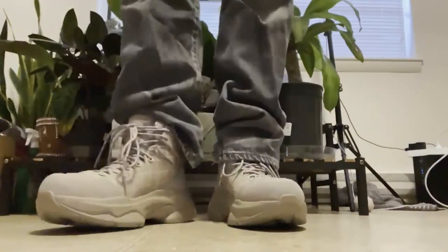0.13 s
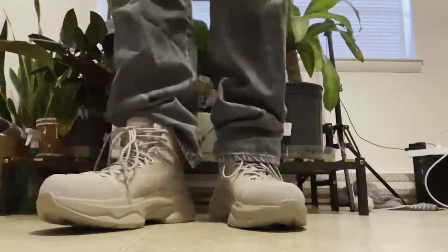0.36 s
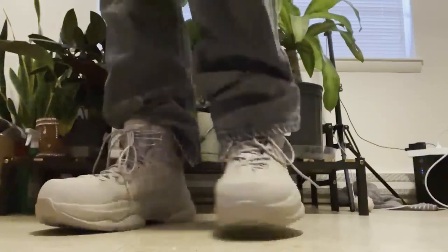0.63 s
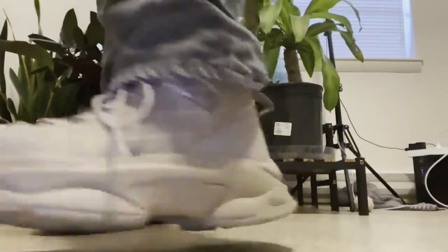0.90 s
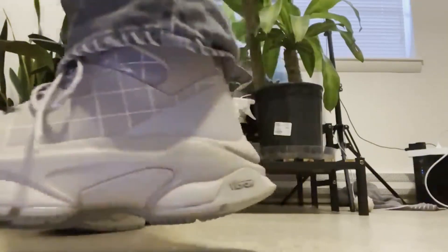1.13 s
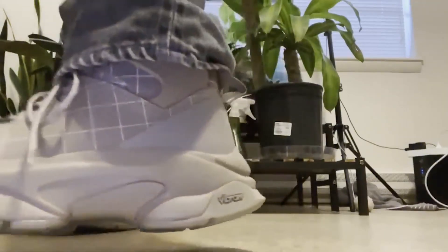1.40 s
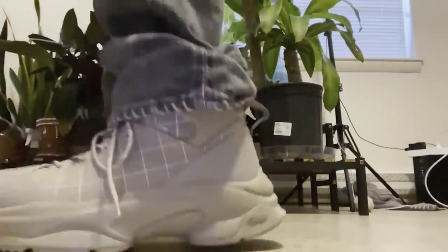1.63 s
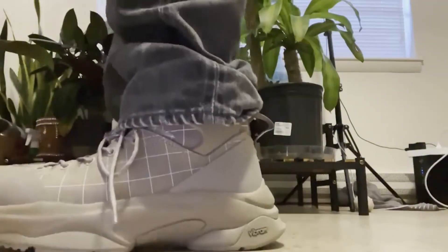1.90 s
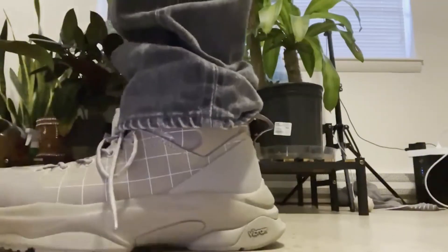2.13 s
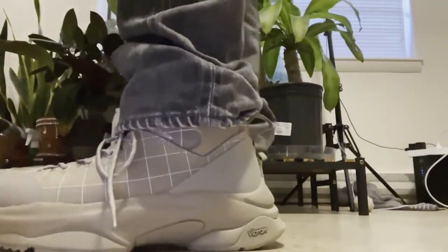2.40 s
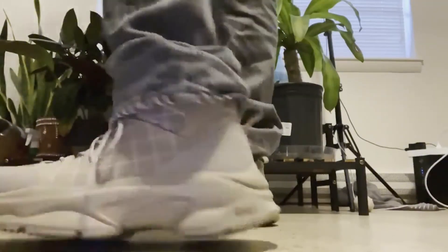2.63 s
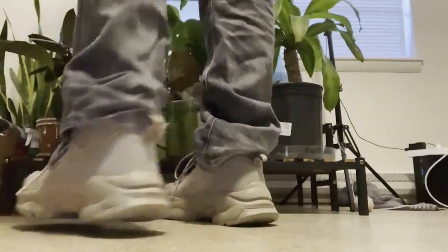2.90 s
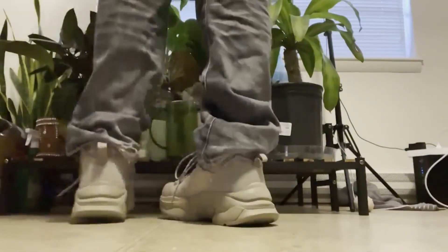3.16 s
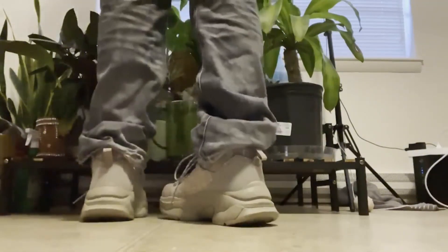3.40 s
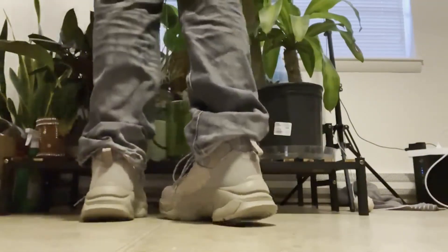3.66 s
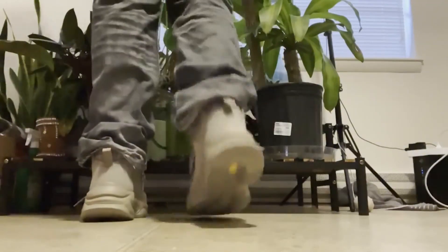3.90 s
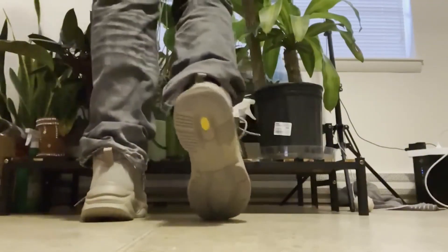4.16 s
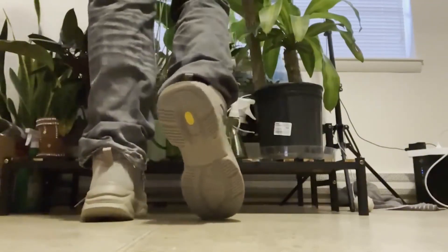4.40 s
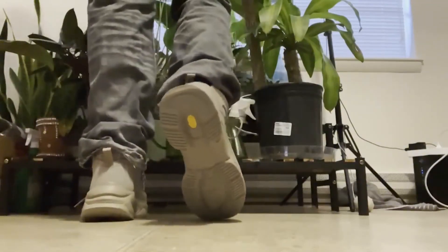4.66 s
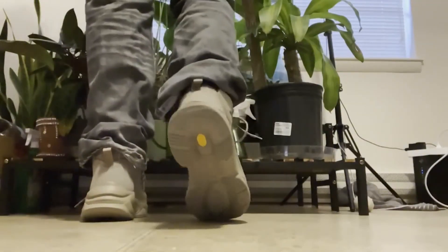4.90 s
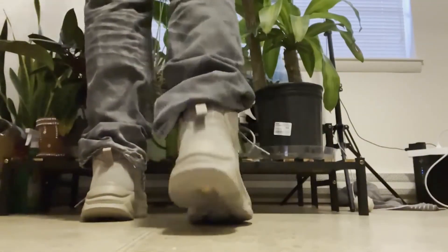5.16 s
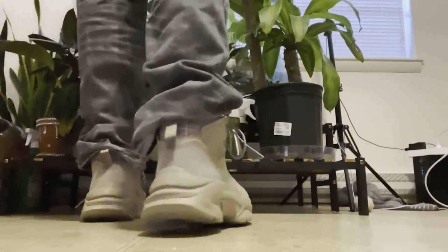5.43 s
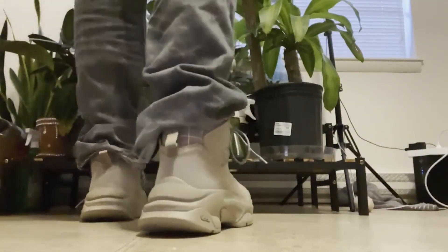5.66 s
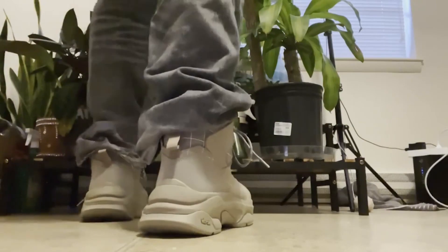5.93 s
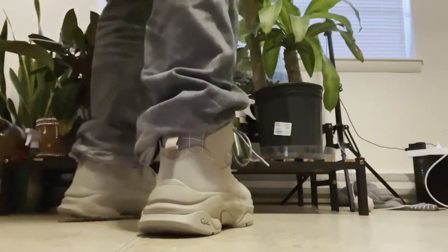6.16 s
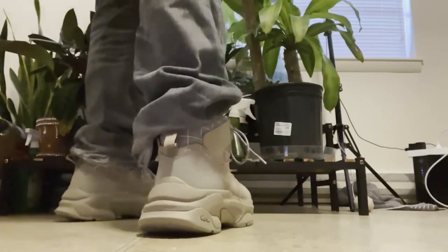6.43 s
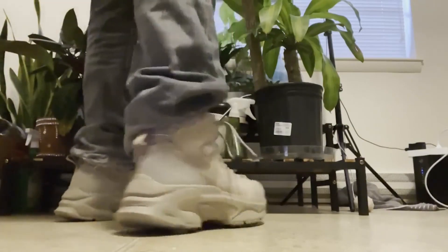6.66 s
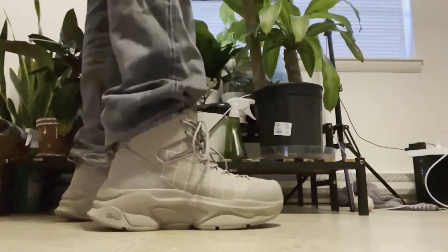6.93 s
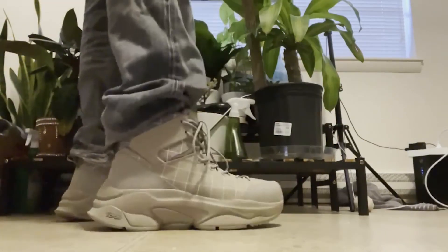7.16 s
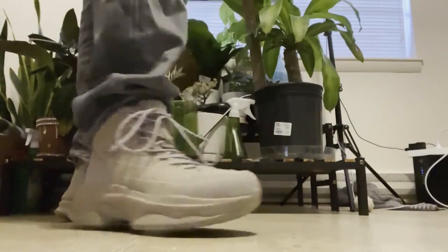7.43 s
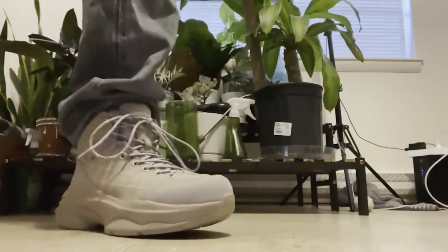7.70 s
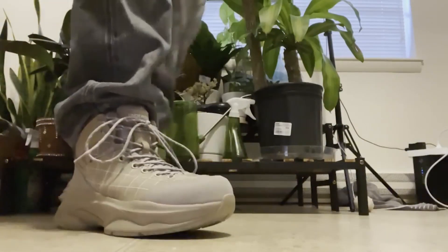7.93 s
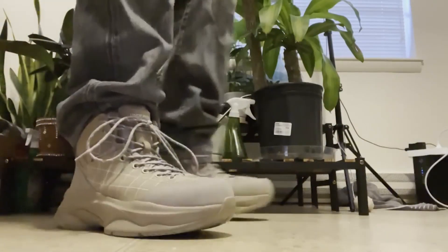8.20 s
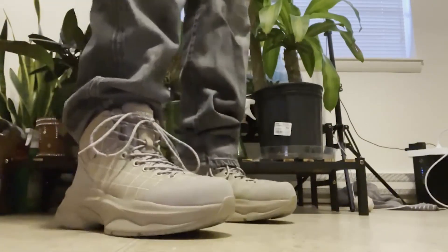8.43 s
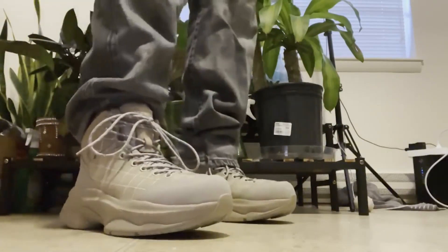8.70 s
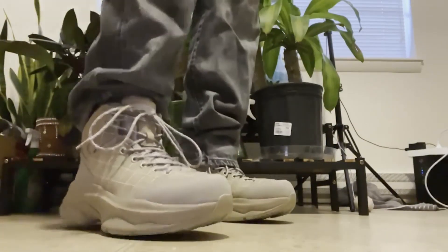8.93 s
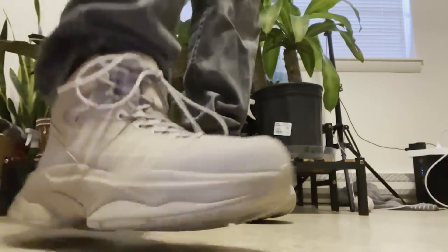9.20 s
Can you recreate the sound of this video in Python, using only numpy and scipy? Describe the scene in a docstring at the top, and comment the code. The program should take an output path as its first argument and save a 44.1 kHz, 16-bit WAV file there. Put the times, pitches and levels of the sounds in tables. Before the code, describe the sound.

Very close, floor-level sound of someone shifting and turning in chunky boots. Footfalls are dull, low thumps that ring briefly in the floor; the tread slips in short dry scuffs, with crisp ticks and very brief rubbery chirps. Pacing is uneven, with pauses of soft cloth rustle. The small room adds short echoes, and a faint hum and whine emerge in the second half.

```python
"""Rubber boots on a hard floor

Chunky rubber-soled boots step, turn and scuff on a hard indoor floor, next to a microphone lying on it.
Footfalls send falling thumps through the floor, which rings on after them. The tread slips as bursts of
jumpy noise, squeaks as short gliding tones and ticks as sharp clicks. Trouser cloth rustles as lumpy noise.
Underneath lie a quiet room tone, a low rumble, faint machine hums and a whine; a room adds short echoes."""
import sys
import numpy as np
from scipy import signal
from scipy.fft import rfft, irfft, next_fast_len
from scipy.io import wavfile
from scipy.ndimage import uniform_filter1d

SR = 44100
rng = np.random.default_rng(int(sys.argv[2]) if len(sys.argv) > 2 else 0)


def voltage_ratio(decibels):
    """Convert decibels (scalar or array-like) to amplitude ratios, 20 dB per decade."""
    exponent = np.asarray(decibels, float) / 20
    return 10 ** exponent


def generate_wav(signal):
    """Clip the signal to [-1, 1] and save it as 16-bit WAV at the path in sys.argv[1]."""
    frames = np.transpose(np.atleast_2d(signal))
    scaled = np.clip(frames, -1, 1) * 32767
    pcm = np.round(scaled).astype(np.int16)
    wavfile.write(sys.argv[1], SR, pcm)


N = 411012  # length in samples

# footfalls: [t/s, peak level of the blow/dB, bass ring trim/dB, low-mid ring trim/dB,
# extra treble of the blow/dB, growing from 550 Hz and full above 1100 Hz]
FOOTFALLS = [(1.596, -34, -3.5, -8.5, -7), (1.625, -24.5, -2, -11.5, -6), (1.877, -38, -8, 0, -7),
             (2.283, -29, -11, -14, -27), (2.334, -28, -12.5, -4, -4), (2.407, -30.5, -11.5, -18, 11),
             (2.511, -44, 1, -6, -25), (2.559, -42.5, 2, -12, -25), (3.19, -36, -5.5, -3.5, -1),
             (3.282, -20.5, -13.5, -6, -18), (3.919, -32, -4, -5.5, -15), (4.304, -41, -4.5, -8.5, 7),
             (5.446, -38, -3.5, -16, -24.5), (6.127, -29, -5, 2.5, -3), (6.728, -38.5, 9, -4.5, -23),
             (6.786, -31.5, -11.5, -13.5, -1), (6.797, -29.5, -6.5, -4, -4), (7.463, -29, -21.5, -6, -2),
             (7.508, -37, -6, -5.5, -9), (7.791, -41, -8.5, -10, -20), (8.177, -37, -11.5, 2, -12),
             (8.199, -34.5, -18, -16, -10), (8.222, -28.5, -6.5, -7, -10.5), (9.282, -25.5, 0, -9.5, -11)]
# tread dragged on the floor: [t/s, length/s, sole level/dB, hiss level/dB, favoured peak f/Hz]
SCUFFS = [(0.287, 0.036, -45.5, -56, 1065), (0.314, 0.021, -45.5, -47.5, 1064),
          (0.347, 0.047, -36.5, -50, 1756), (0.394, 0.029, -33, -36.5, 638),
          (0.434, 0.0078, -35, -32.5, 5970), (0.444, 0.027, -31, -31, 920), (1.34, 0.023, -60, -77, 700),
          (1.846, 0.13, -47.5, -64, 343.4), (2.332, 0.016, -43, -64, 804), (2.468, 0.028, -45, -62, 1530),
          (2.496, 0.015, -39.5, -46.5, 1056), (2.538, 0.011, -39, -44.5, 2452),
          (2.555, 0.0086, -35.5, -43.5, 1198), (2.651, 0.012, -58, -59, 7500),
          (2.677, 0.04, -52.5, -56.5, 1082), (3.183, 0.047, -58, -55, 6730), (3.297, 0.088, -53, -65, 492),
          (3.464, 0.019, -42.5, -49.5, 589), (3.513, 0.03, -50.5, -54.5, 511),
          (3.538, 0.014, -26, -35, 475), (3.563, 0.021, -40.5, -74, 498), (3.65, 0.026, -39.5, -49.5, 3250),
          (3.68, 0.035, -29.5, -31, 1036), (3.706, 0.015, -30, -31, 7670), (3.907, 0.025, -59, -60, 1807),
          (4.294, 0.058, -56, -66.5, 628), (5.026, 0.0091, -38, -42, 2046), (5.059, 0.0058, -63, -58, 2060),
          (5.073, 0.013, -48, -51, 440), (5.1, 0.014, -35.5, -43.5, 450), (5.135, 0.0078, -48, -52, 2006),
          (5.176, 0.022, -43.5, -49.5, 1970), (5.206, 0.016, -46.5, -53, 3400),
          (5.239, 0.015, -51, -38, 5480), (5.308, 0.04, -38.5, -41, 1954),
          (5.334, 0.089, -40.5, -44.5, 2114), (5.471, 0.038, -44.5, -54, 1840),
          (5.841, 0.095, -56, -64.5, 1690), (6.415, 0.046, -53.5, -47, 6650),
          (6.446, 0.0061, -36.5, -53, 840), (6.487, 0.022, -43.5, -44.5, 2910),
          (6.51, 0.045, -42, -49, 514), (6.557, 0.005, -34, -59, 740), (6.564, 0.019, -43, -56, 2350),
          (6.735, 0.0097, -51, -52.5, 1500), (7.197, 0.017, -41.5, -57, 1170),
          (7.211, 0.061, -57, -47.5, 2610), (7.273, 0.028, -51.5, -44.5, 1488),
          (7.46, 0.0085, -36, -44, 363), (7.478, 0.022, -49, -55, 2100), (7.772, 0.039, -50, -73, 490),
          (7.851, 0.026, -46.5, -53, 1990), (7.877, 0.064, -49.5, -52, 1027),
          (8.174, 0.074, -50, -52.5, 550), (8.353, 0.022, -49, -63, 748), (8.413, 0.039, -54, -52.5, 1744),
          (8.483, 0.0089, -40, -52.5, 2130), (8.792, 0.024, -44.5, -62, 764),
          (8.844, 0.024, -58, -64, 1674), (9.276, 0.039, -59.5, -61.5, 1616)]


def evened(x):
    """Brings a sound to an average (rms) level of 1."""
    return x / np.sqrt(np.mean(x ** 2) + 1e-20)


def read(points, hz):
    """Reads a (Hz, value) curve at any pitch, with straight lines between points on a log pitch scale."""
    f, value = np.transpose(points)
    return np.interp(np.log(hz + 1), np.log(f + 1), value)


def curve(rows):
    """Joins (s, value) points into one value per sample."""
    s, value = np.transpose(rows)
    return np.interp(np.arange(N) / SR, s, value)


def add(mix, s, sound):
    """Adds a sound to the mix, starting at s seconds."""
    part = mix[round(s * SR):][:len(sound)]
    part += sound[:len(part)]


def coloured(x, points):
    """Filters a sound by a (Hz, dB) curve."""
    size = next_fast_len(len(x) + 4096)
    gain = voltage_ratio(read(points, np.fft.rfftfreq(size, 1 / SR)))
    return irfft(rfft(x, size) * gain, size)[:len(x)]


def resonate(x, hz, width):
    """A resonance of gain 1, width Hz wide, that follows the curve hz."""
    turn = np.exp(2j * np.pi * np.cumsum(hz * np.ones(len(x))) / SR)
    r = np.exp(-np.pi * width / SR)
    # shift the pitch hz down to zero, smooth, and shift back up
    return 2 * (turn * signal.lfilter([1 - r], [1, -r], x / turn + 1e-18)).real


def body(x, modes):
    """A solid body answers the noise at several pitches of its own, each a pair of resonances in a row."""
    return evened(sum(voltage_ratio(db) * resonate(resonate(x, hz, width), hz, 3 * width) for hz, width, db in modes))


def slips(per_s, spread_db, last_s, steady_s):
    """Noise whose size jumps with each slip of the contact and fades until the next; even over steady_s."""
    jump = voltage_ratio(spread_db * np.minimum(rng.exponential(1, N), 3))
    jump = jump * (rng.random(N) < per_s / SR)
    # run through twice and keep the second half, so it is already going at the start
    size = signal.lfilter([1], [1, -np.exp(-1 / (last_s * SR))], np.tile(jump, 2))[N:]
    size /= np.sqrt(abs(uniform_filter1d(size ** 2, round(steady_s * SR))) + 0.0013)
    return evened(size * rng.standard_normal(N))


def after(events, last_s):
    """Power that jumps at each (s, dB) event and dies away, as dB."""
    kicks = np.zeros(N)
    for s, db in events:
        kicks[round(s * SR)] += voltage_ratio(2 * db)
    return 10 * np.log10(signal.lfilter([1], [1, -np.exp(-1 / (last_s * SR))], kicks) + 1e-14)


def power_sum(a_db, b_db):
    """Level of two unrelated sounds together."""
    return 10 * np.log10(voltage_ratio(2 * a_db) + voltage_ratio(2 * b_db))


def steps():
    """Bending waves in the floor carry treble faster than bass, so each blow arrives as a falling sweep."""
    # tone of a blow: [f/Hz, level/dB]
    blow = [(40, -19.5), (100, 3.5), (300, -3), (700, -4), (1150, -4), (1450, -15.5), (2000, -22),
            (3000, -42), (8000, -76)]
    # ringing pitches of the floor: [f/Hz, base level/dB, time to fall by 60 dB/s]
    slab = [(58, -5.5, 0.11), (82.8, -3, 0.059), (146, 4.5, 0.041), (173.6, -3, 0.092), (238.7, -7.5, 0.13),
            (325, -15.5, 0.11), (450, -9, 0.038), (614, -16, 0.066), (1000, -16, 0.021)]
    knock_hz = 390
    lag = 0.111  # delay in s = lag / sqrt(Hz)
    out = np.zeros(N)
    hz, t = np.fft.rfftfreq(16384, 1 / SR), np.arange(16384) / SR
    late = np.maximum(t - .011, 0)  # the ring starts 11 ms into the sound
    chance = rng.random((len(FOOTFALLS), len(slab), 2))
    # shift the whole sweep so that 1300 Hz arrives 7 ms into the sound
    phase = 4 * np.pi * lag * np.sqrt(hz) + 2 * np.pi * hz * (.007 - lag / np.sqrt(1300))
    knock_db = 4 * np.exp(-(np.log2((hz + 1) / knock_hz) / .5) ** 2)
    for (s, db, bass_db, mid_db, snap_db), luck in zip(FOOTFALLS, chance):
        # soft landings give duller blows
        treble_db = snap_db * np.clip(np.log2((hz + 1) / 550), 0, 1)
        sweep = irfft(voltage_ratio(read(blow, hz) + knock_db + treble_db) * np.exp(-1j * phase + .8j))
        ring = np.zeros(len(t))
        for (f, mode_db, t60), (a, b) in zip(slab, luck):
            trim_db = bass_db if f < 120 else mid_db
            level_db = mode_db + 3.02 * (a + 1.5) - 60 * late / t60 + trim_db
            ring += voltage_ratio(level_db) * np.sin(2 * np.pi * (f * late + b * min(f / 400, 1)))
        ring *= 1 - np.exp(-late / 0.0057)  # swells over about 6 ms
        add(out, s - .005, voltage_ratio(db) * (sweep / abs(sweep).max() + ring))
    return out


def scuffs():
    """One stream of slips drives the sole body, the lugs and the hiss; each contact favours its own peaks."""
    # resonances of the sole, then of the tread lugs: [f/Hz, width/Hz, level/dB]
    sole = [(440, 100, 5.5), (594, 190, 6.5), (972, 355, 2), (1080, 58, 0.5)]
    lugs = [(1860, 260, 15), (2400, 410, 7.5), (3065, 1740, 0)]
    # where sole, lugs and hiss usually peak: [lowest f/Hz, highest f/Hz]
    peak_ranges = [(400, 1250), (1500, 3000), (5400, 7600)]
    # sole below the first pitch, lugs between, hiss above the second: [f/Hz]
    part_edges_hz = [1400, 4400]
    # lug rasp against the mean of sole and hiss; the second when the favoured peak is a lug's
    rasp_db, rasp_favoured_db = -4.5, 2.5
    # time constant of the stop: this many seconds plus this share of the scuff's length
    release_s, release_share = .003, .13
    chance_peak_db = -8.5  # peaks of the parts that a contact does not favour

    force, peak_hz, peak_db = np.zeros((3, N)), np.full((3, N), 1000.), np.zeros((3, N))
    low, high = np.transpose(peak_ranges)
    for (s, length, sole_db, hiss_db, hz), luck in zip(SCUFFS, rng.random((len(SCUFFS), 3))):
        t = np.arange(0, length + .06, 1 / SR)
        rise = 1 - np.exp(-t / (0.00044 + 0.22 * length))
        fall = np.exp(-np.maximum(t - 0.77 * length, 0) / (release_s + release_share * length))
        part = np.searchsorted(part_edges_hz, hz)
        lug_db = (sole_db + hiss_db) / 2 + (rasp_favoured_db if part == 1 else rasp_db)
        for band, db in zip(force, (sole_db, lug_db, hiss_db)):
            add(band, s, voltage_ratio(db) * rise * fall)
        peaks = low * (high / low) ** luck
        peaks[part] = hz
        # these peaks hold until the next scuff
        start = round(s * SR)
        peak_db[:, start:] = chance_peak_db * (np.arange(3) != part)[:, None]
        peak_hz[:, start:] = peaks[:, None]

    drive = slips(900, 8.3, 0.002, 0.0046)
    hiss = evened(coloured(drive, [(2500, -48.0), (4700, 10), (16000, 4.0)]))
    plain = body(drive, sole), body(drive, lugs), hiss
    out = np.zeros(N)
    for i, (width, base_db) in enumerate([(260, 1), (550, 1), (1100, -2)]):
        peak = evened(resonate(resonate(drive, peak_hz[i], width), peak_hz[i], 2 * width))
        share_db = base_db + peak_db[i]
        out += force[i] * (plain[i] + voltage_ratio(share_db) * peak) / np.sqrt(1 + voltage_ratio(2 * share_db))
    return out


def squeaks():
    """Rubber sings as it sticks and slips: gliding tones with overtones and an unsteady size."""
    # squeaks: [t/s, length/s, starting f/Hz, ending f/Hz, level/dB], before the wobble
    squeak_rows = [(.451, 0.0078, 12000, 10400, -33.5), (0.469, 0.0082, 9450, 13300, -28),
                   (2.561, 0.01, 1114, 2040, -29.5), (2.567, 0.0077, 8960, 12200, -40),
                   (3.203, 0.008, 6760, 4600, -48.5), (3.687, 0.014, 7400, 7700, -40),
                   (3.708, 0.0023, 7200, 7740, -21.5), (3.717, 0.01, 7380, 7350, -29.5),
                   (6.442, 0.012, 7800, 6880, -31.5), (6.559, 0.0049, 860, 705, -23.5),
                   (7.207, 0.0051, 990, 1540, -31), (7.223, 0.041, 2854, 2664, -51),
                   (7.23, 0.03, 5930, 5300, -51), (7.265, 0.015, 1483, 1700, -34),
                   (7.281, 0.0112, 2200, 3280, -42), (7.467, 0.0043, 7470, 5130, -29.5),
                   (7.468, 0.0073, 5080, 5020, -26), (7.889, 0.0058, 1100, 1000, -36),
                   (8.424, 0.011, 750, 1300, -35), (8.436, 0.04, 1690, 1790, -44),
                   (8.798, 0.0071, 597, 1210, -55)]
    # overtones weaken at nearly the same rate at every pitch: [f/Hz, level change per overtone/dB]
    overtones = [(800, -17), (7000, -17.5)]
    out = np.zeros(N)
    for s, length, from_hz, to_hz, db in squeak_rows:
        slope_db = read(overtones, to_hz)
        u = np.linspace(0, 1, round(length * SR))  # progress from 0 to 1
        wobble = uniform_filter1d(rng.standard_normal((2, 2000)), 40)[:, :len(u)]
        pitch = (from_hz + (to_hz - from_hz) * u) * (1 + 0.2 * wobble[0])
        turns = np.cumsum(pitch) / SR
        tone = sum(voltage_ratio(slope_db * k) * np.sin(2 * np.pi * (k + 1) * turns)
                   for k in range(4) if (k + 1) * to_hz < 14000)
        add(out, s, voltage_ratio(db + 12 * wobble[1]) * tone * np.sin(np.pi * u) ** .5)
    return out


def ticks():
    """Lugs let go of the floor: each gives a sharp wide click, strongest around its own pitch."""
    # clicks: [t/s, peak level/dB, f/Hz]
    tick_rows = [(0.247, -41.5, 2030), (0.2952, -41, 6710), (0.331, -37, 7250), (0.4186, -22.5, 6100),
                 (1.3463, -46.5, 5900), (1.599, -36, 4940), (2.379, -31.5, 2690), (2.684, -43, 2100),
                 (3.6528, -30, 3270), (4.306, -48, 2010), (5.027, -43, 2270), (5.0554, -44, 2000),
                 (5.0761, -31, 2180), (5.1037, -45, 2260), (5.2024, -29.5, 5340), (5.208, -35, 6730),
                 (5.212, -27, 5440), (5.236, -27, 5500), (5.3192, -31, 2000), (6.225, -37.5, 6200),
                 (6.2577, -26, 7160), (6.2634, -41, 6300), (6.2812, -31, 6350), (6.2858, -38, 6430),
                 (6.355, -46, 7210), (6.378, -45, 2130), (7.178, -49, 2060), (3.41, -57, 6800),
                 (6.4358, -26, 7100), (6.56, -24, 2400), (8.3472, -46, 3020), (8.364, -52, 2260),
                 (8.482, -39, 2670), (8.496, -55, 2010), (8.8033, -45, 2030)]
    out, t = np.zeros(N), np.arange(400) / SR
    for (s, db, hz), noise in zip(tick_rows, rng.standard_normal((len(tick_rows), 400))):
        burst = noise * np.exp(-t / 0.0013)
        snap = coloured(burst, [(300, -22), (hz / 1.4, -11), (hz, 0), (hz * 2.0, -10), (16000, -16)])
        add(out, s, voltage_ratio(db) * snap / abs(snap).max())
    return out


def rustle():
    """Folds of cloth rub as the legs move: lumpy dull noise with a fine hiss on top."""
    # cloth moving with the legs: [t/s, dull rub level/dB]
    leg_rub = [(0.0, -51), (0.2, -56), (0.55, -60), (0.8, -52.5), (0.9, -62.5), (1.13, -59), (1.18, -71),
               (1.36, -77.5), (1.45, -55), (1.85, -53), (2.26, -62), (2.45, -48.5), (2.75, -77),
               (2.98, -57), (3.17, -63.5), (3.25, -53), (3.9, -52.5), (4.21, -68), (4.45, -85.5),
               (4.98, -57), (5.5, -59.5), (6.4, -56.5), (6.98, -59), (7.6, -68.5), (7.84, -52.5),
               (7.99, -67.5), (8.4, -52), (8.8, -74.5), (9.24, -59.5), (9.32, -63.5)]
    # tone of the dull rub: [f/Hz, level/dB]
    cloth = [(120, -42), (200, -5.5), (274, -3), (658, -1.5), (1100, -5.5), (1450, -12), (1910, -11.5),
             (2850, -19.5), (4000, -30), (5200, -51.5), (8800, -120)]
    # fine hiss at the easy rub level, its growth in dB per dB of rub, and that easy level
    hiss_db, hiss_per_db, easy_db = -72.5, 1.055, -58
    # each scuff swings the cloth: level against the scuff, dying time, evening-out of levels, build-up time
    swing_db, swing_s = -15.5, 0.058
    swing_law, build_s = 0.69, .03

    dull = evened(coloured(slips(500, 18.2, 0.047, 0.093), cloth))
    fine = slips(2200, 0.91, 0.0042, 0.11)
    fine = evened(coloured(fine, [(2000, -27.5), (3500, 5), (7000, -4.0), (16000, -6.5)]))
    swings = []
    for s, _, sole_level, hiss_level, _ in SCUFFS:
        loudest_db = max(sole_level, hiss_level)
        swings.append((s, easy_db + swing_law * (loudest_db + swing_db - easy_db)))
    swing = uniform_filter1d(after(swings, swing_s), round(build_s * SR))
    rub_db = power_sum(curve(leg_rub), swing)
    return voltage_ratio(rub_db) * dull + voltage_ratio(hiss_db + hiss_per_db * (rub_db - easy_db)) * fine


def still_air():
    """Steady soft noise of the room."""
    # tone of the noise: [f/Hz, level/dB]
    air_tone = [(12, -27.5), (20, -0.5), (49, -10), (130, -5.5), (198, -31.5), (241, -16), (301, -38),
                (337, -23), (897, -38), (1480, -42), (16000, -53.5)]
    return voltage_ratio(-64.5) * evened(coloured(rng.standard_normal(N), air_tone))


def rumble():
    """Low noise that wavers, and swells as each footfall leaves the floor shaking."""
    # wavering rumble: [t/s, level/dB]
    waver = [(0.0, -52.5), (1.43, -68), (1.79, -65), (2.1, -59), (2.49, -50), (2.65, -73), (3.11, -66),
             (3.35, -62), (4.62, -66.5), (5.53, -57), (7.42, -55), (7.55, -50.5), (8.57, -68.5),
             (9.32, -54)]
    # shaking: level against the footfall's peak level, dying time in s
    shake_db, shake_s = -28, 0.04
    low = coloured(rng.standard_normal(N),
                   [(15, -18.5), (30, -6), (45, -3.5), (120, -6.0), (170, -19.0), (400, -49.5)])
    shakes = after([(row[0], row[1] + shake_db) for row in FOOTFALLS], shake_s)
    return voltage_ratio(power_sum(curve(waver), shakes)) * evened(low)


def hums():
    """Machine hums come and go: each is a steady tone plus narrow noise that makes it waver."""
    # hums: [f/Hz, start t/s, end t/s, level of the steady tone/dB]
    hum_rows = [(43.7, 4.8, 6.4, -56), (44, 7.8, 9.4, -56), (141.8, 5.3, 8.7, -58.5), (222, 6.3, 9.1, -69)]
    t, out = np.arange(N) / SR, np.zeros(N)
    for hz, start, end, db in hum_rows:
        fade = np.clip(np.minimum(t - start, end - t) / 0.24, 0, 1)
        waver = evened(resonate(resonate(rng.standard_normal(N), hz, 5.9), hz, 2.1))
        out += voltage_ratio(db) * fade * (np.sin(2 * np.pi * hz * t) + 0.44 * waver)
    return out


def whine():
    """A fuzzy fan-like whine, noise through two resonances, sets in over a second."""
    t = np.arange(N) / SR
    fuzz = evened(resonate(resonate(rng.standard_normal(N), 1574, 83), 2150, 180))
    return voltage_ratio(-76.5) * np.clip(t - 4.8, 0, 1) * fuzz


def room(x):
    """Sparse echoes of random sign, strong from nearby things at first, then each band dies at its own speed."""
    # slow dying of the echoes: [f/Hz, time to fall by 60 dB/s]
    decay = [(100, 0.63), (500, 0.18), (2000, 0.49), (7000, 0.35), (12000, 0.17)]
    taps = np.zeros(SR // 2)
    at = np.arange(130, SR // 2 - 20, 20)
    taps[at + rng.integers(0, 20, len(at))] = rng.choice([-1., 1.], len(at))
    hz, t, z = signal.stft(taps, SR, nperseg=128)
    slow = voltage_ratio(-60 * t / np.clip(read(decay, hz), .05, 2)[:, None])
    nearby = voltage_ratio(0.5 - 60 * t / 0.16)
    tail = signal.istft(z * (slow + nearby), SR, nperseg=128)[1]
    return signal.fftconvolve(x, tail / np.linalg.norm(tail))[:N]


def scene():
    """Boots direct and through the room, with the cloth and the background added dry."""
    falls, rubs, tones, clicks = steps(), scuffs(), squeaks(), ticks()
    wet = room(voltage_ratio(-6.5) * rubs + voltage_ratio(-12.0) * tones + voltage_ratio(-11.0) * clicks + voltage_ratio(-6.5) * falls)
    background = still_air() + rumble() + hums() + whine()
    return (falls + rubs + tones + clicks + wet + rustle() + background)[None]


def roll_off(x):
    """The treble ends steeply here."""
    return signal.sosfilt(signal.butter(12, 16450, fs=SR, output="sos"), x)


def record(dry):
    """The small microphone has a notch near 9 kHz and fades above 13 kHz."""
    # microphone response: [f/Hz, level/dB]
    microphone = [(20, -30), (40, -2.5), (4500, -0.5), (7300, 4), (8200, 0), (8950, -8), (10000, 3),
                  (12300, 2.5), (13300, -4), (14100, -25), (15000, -7), (16200, -48)]
    mix = coloured(dry[0], microphone)[None]
    return roll_off(mix)


dry = scene()
out = record(dry)
generate_wav(out)
```